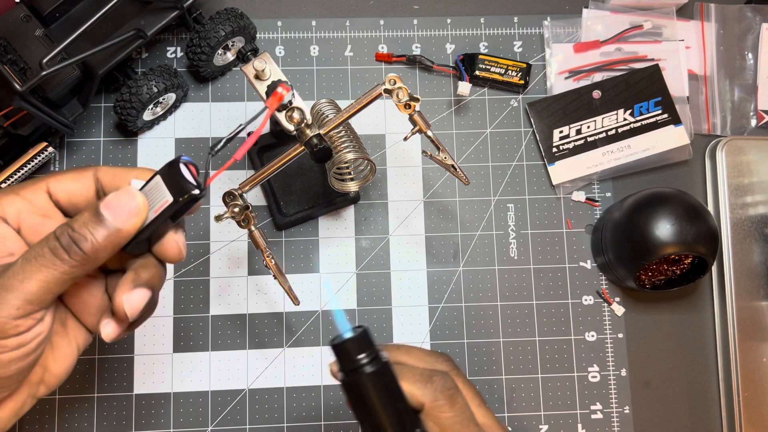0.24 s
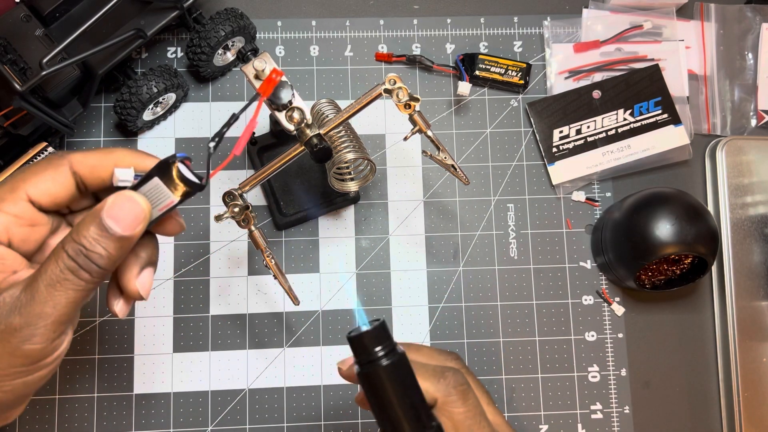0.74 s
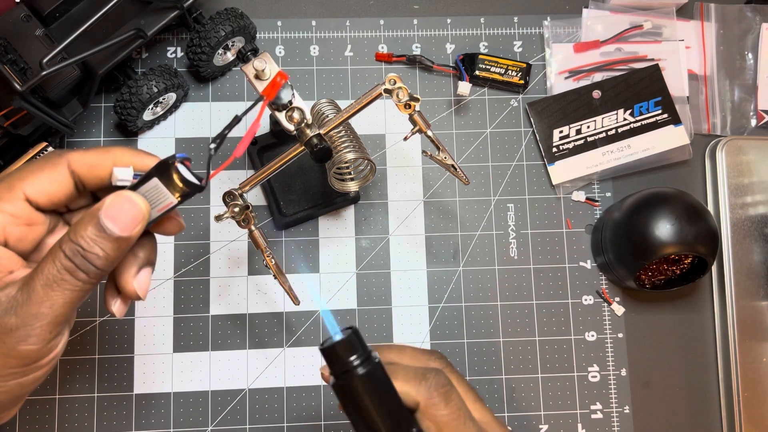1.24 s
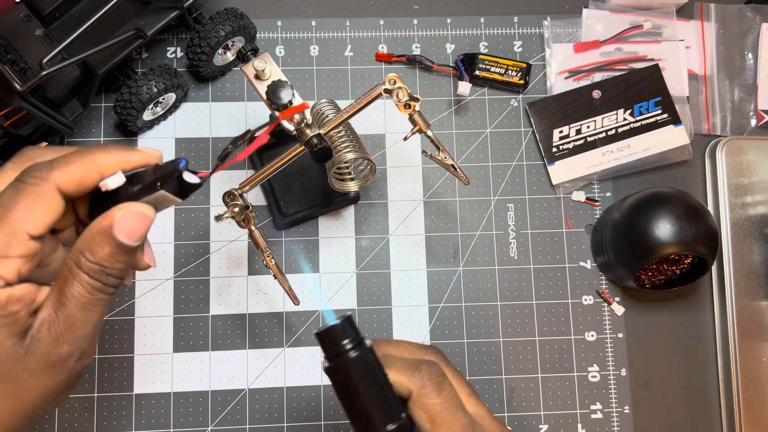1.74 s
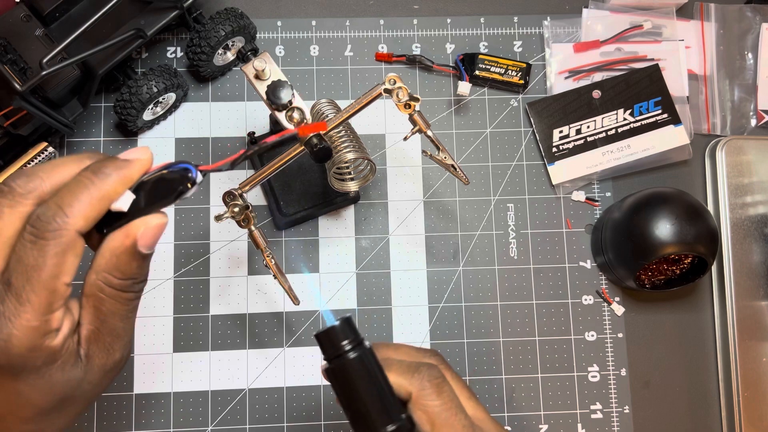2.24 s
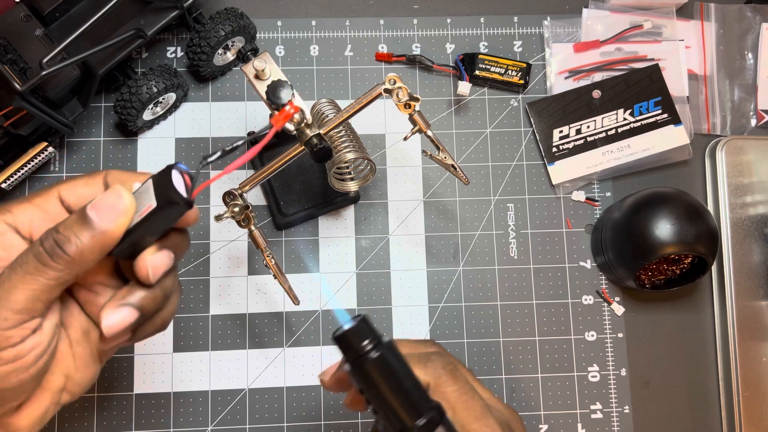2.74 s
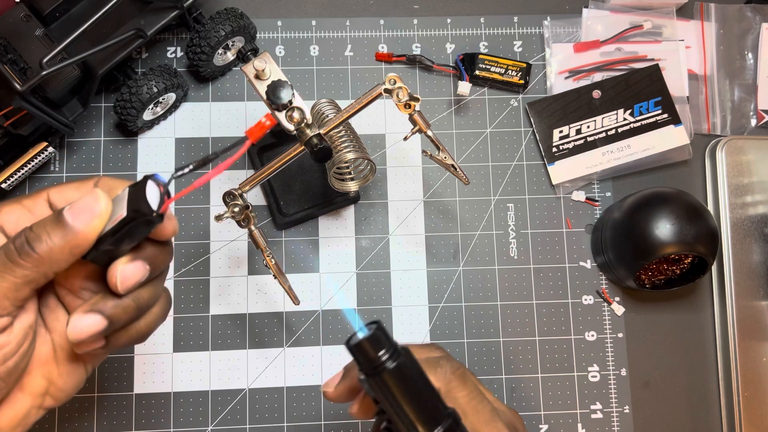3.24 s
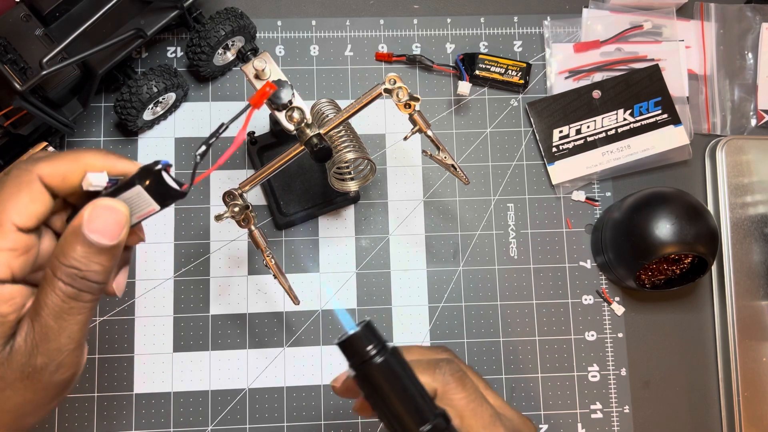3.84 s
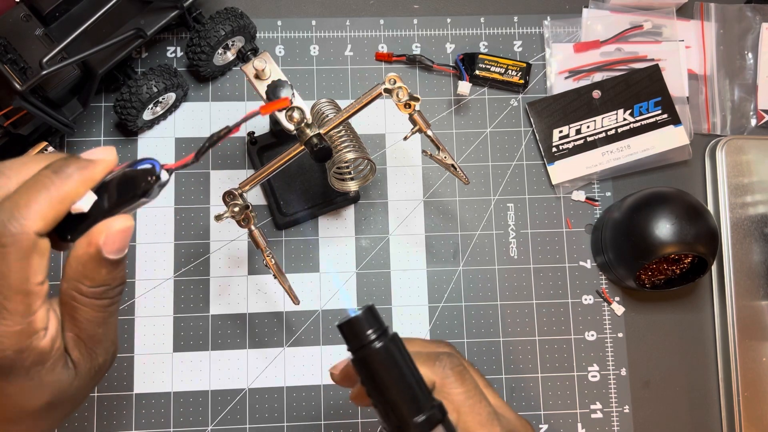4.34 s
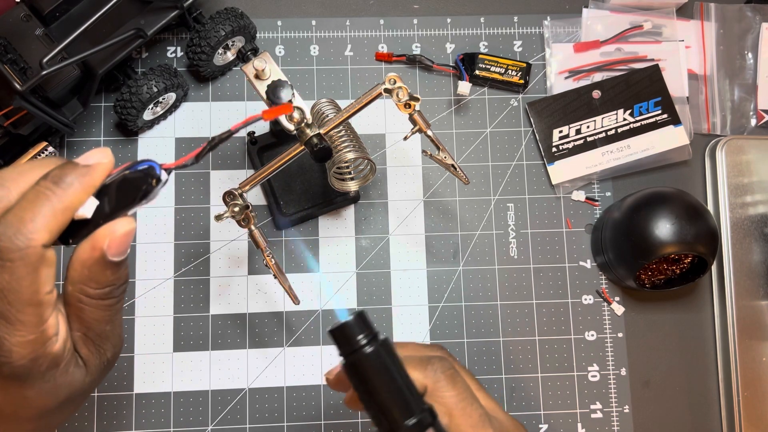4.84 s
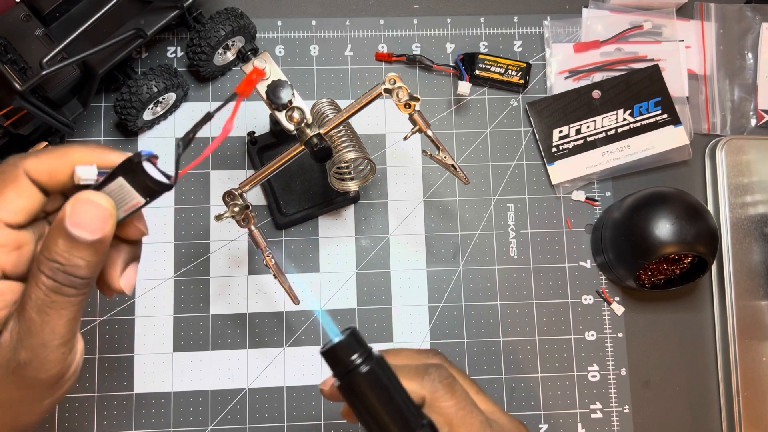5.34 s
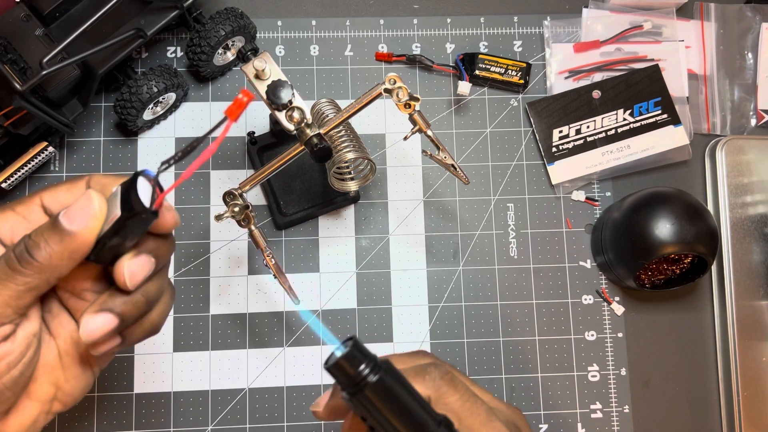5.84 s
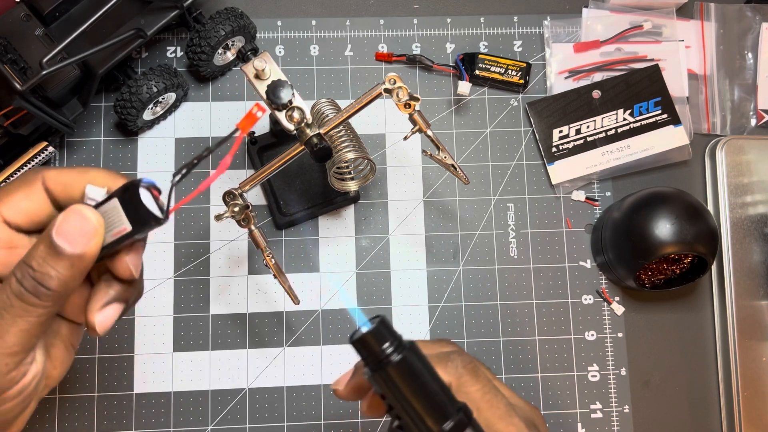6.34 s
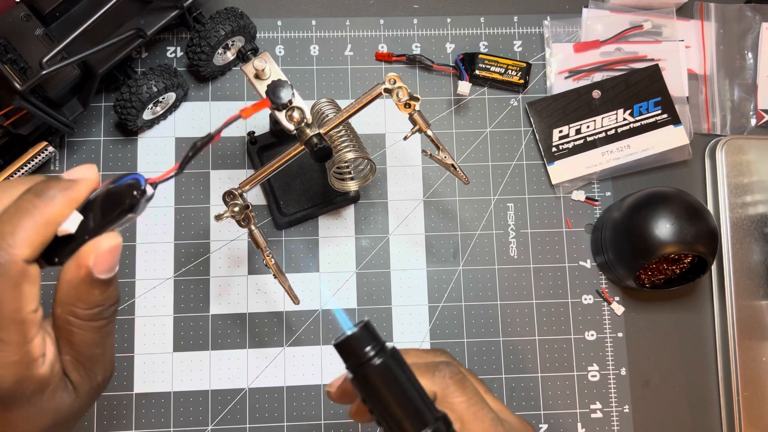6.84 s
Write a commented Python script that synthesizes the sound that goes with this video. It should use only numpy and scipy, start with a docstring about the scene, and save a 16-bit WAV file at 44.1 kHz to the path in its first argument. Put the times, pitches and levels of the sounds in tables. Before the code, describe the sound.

For about seven seconds a handheld gas torch burns close to the microphone in a workshop, already lit at the start and never going out. A bright, wide gas hiss is constant, with two narrow breathy whistling bands, one fairly high and one higher. Beneath lie very low stirring air and a surging low throb. The flame tears into ragged roars several times a second: longer flares near 0, 1.0, 2.6, 4.0 and 5.4, shorter ones between, the hiss swelling slightly in the gaps. Small dry spits crack around 0.2, 0.7, 1.6, 2.5, 3.1, 3.8, 4.5, 5.2, 5.8 and 6.9. As the torch turns, notably around 2.5 and from 4.6 onward, the hiss changes colour and its resonances glide. Close bench reflections and a faint room tail surround it; it ends still burning.

```python
"""Above a workbench, close to the microphone, a handheld gas torch burns with a faint workshop tail.
A stir of hot air and a low, surging flame throb lie underneath, both made of shaped noise.
The flame flares into a ragged roar of noise bursts several times a second and now and then spits.
The gas jet hisses and whistles through the burner tube's resonances, which glide as the torch turns."""
import sys
import numpy as np
from scipy import signal
from scipy.fft import rfft, irfft
from scipy.io import wavfile

SR = 44100
rng = np.random.default_rng(int(sys.argv[2]) if len(sys.argv) > 2 else 0)


def master(y):
    """Save y as 16-bit WAV."""
    cut = np.clip(np.atleast_2d(y).T, -1, 1)
    pcm = np.round(cut * 32767)  # scale
    wavfile.write(sys.argv[1], SR, pcm.astype(np.int16))


N = 313110
T = np.arange(N) / SR
HZ = np.fft.rfftfreq(N, 1 / SR)

# Spectral shapes before levelling, dB being relative density.
# hot air stirring near the microphone: [f/Hz, level/dB]
DRAUGHT_SHAPE = [(5, -1.5), (14, 8.5), (25, -4), (42, -3), (60, -4.5), (80, -19.5), (130, -44), (400, -63)]
# the low pulsing of the flame: [f/Hz, level/dB]
THROB_SHAPE = [(50, -28), (82, -22), (103, -6.5), (122, -4), (140, .5), (153, -3), (167, 2), (188, -15.5),
               (222, -10), (238, -12), (256, -14), (312, -18), (400, -50.5)]
# the steadier rumble of the burning gas: [f/Hz, level/dB]
RUMBLE_SHAPE = [(100, -2.5), (180, -2), (205, -1.5), (238, 1.5), (258, -1.5), (310, -4.5), (342, -10.5),
                (500, -43.5)]
# the burning eddies: [f/Hz, level/dB]
ROAR_SHAPE = [(150, -3.5), (300, -6), (380, 4), (432, -12), (505, 1), (720, 1.5), (1000, -6.5),
              (1130, -9.5), (1390, -7), (1680, -21), (1900, -10.5), (2080, -11), (2400, -22.5), (3200, -21),
              (5000, -32), (10000, -51)]
# the hiss under the tube resonances: [f/Hz, level/dB]
JET_SHAPE = [(500, 9), (1500, -44), (2400, -1.5), (3400, -4), (3750, -2), (4650, 5), (5020, -4), (5600, -6),
             (6700, -3.5), (7300, 1.5), (10000, -3.5), (10700, -12), (14000, -7), (14500, -25), (15600, -8)]

# moments when the low throb swells or chokes: [middle t/s, length t/s, change level/dB]
THROB_SURGES = [(1.16, 0.042, -7), (1.597, 0.075, 7.5), (1.786, 0.028, -7), (2.157, .1, 3.5),
                (3.822, 0.046, 6), (4.194, 0.034, 6), (4.284, 0.1, -6), (4.951, 0.12, 4.5),
                (5.391, 0.076, 6), (5.495, 0.065, -5), (5.56, 0.046, 5.5), (6.154, 0.31, 2),
                (6.94, 0.072, -2.5)]
# bench and room resonances, lifts and dips in the roar: [f/Hz, width f/Hz, level/dB]
BENCH_MODES = [(355.5, 18, -20), (496, 7.1, -7.5), (550.5, 7.5, 4), (599, 18, -13.5), (778, 21, -2.5),
               (737, 30, 2), (838, 12, 5.5), (880, 48, -1.5), (938, 20, 7.5), (1042, 14, 9.5),
               (1079, 34, -11.5), (1212, 34, 3.5), (1414, 3.4, 7.5), (1833, 9.9, 6.5)]
# flares, in which the flame tears into a roar: [start t/s, length t/s, level/dB before the roar's trim]
FLARES = [(0.011, 0.24, -44.5), (0.294, 0.11, -43.5), (0.432, 0.032, -43.5), (0.599, 0.063, -43.5),
          (0.733, 0.07, -45), (0.882, 0.11, -45.5), (1.039, 0.24, -44.5), (1.39, 0.065, -47),
          (1.577, 0.075, -44), (1.776, 0.04, -45), (1.931, 0.062, -45.5), (2.115, 0.08, -47),
          (2.29, 0.035, -48.5), (2.462, 0.058, -45), (2.537, 0.03, -47.5), (2.602, 0.21, -47.5),
          (2.841, 0.033, -50), (2.91, 0.019, -43), (3.075, 0.078, -47), (3.228, 0.073, -47.5),
          (3.37, 0.14, -46), (3.542, 0.071, -46.5), (3.64, 0.06, -45), (3.76, 0.049, -47),
          (3.855, 0.09, -46), (3.966, 0.18, -46.5), (4.199, 0.13, -44), (4.469, 0.095, -45),
          (4.803, 0.14, -48), (5.22, 0.058, -46), (5.377, 0.27, -45.5), (5.73, 0.04, -47),
          (5.792, 0.047, -42), (5.946, 0.065, -42.5), (6.077, 0.1, -48.5), (6.206, 0.022, -47),
          (6.271, 0.04, -48), (6.318, 0.13, -46.5), (6.714, 0.038, -46), (6.792, 0.044, -47),
          (6.909, 0.17, -46)]
# spits of the flame: [t/s, crack peak level/dB before the spits' trim]
SPITS = [(.168, -32), (.218, -25.5), (0.248, -28), (.374, -35), (0.662, -26.5), (1.595, -31),
         (2.479, -27.5), (3.132, -25), (3.766, -31), (4.472, -28.5), (4.712, -30.5), (5.161, -28.5),
         (5.806, -32), (6.916, -30.5)]
# how the torch is held: [t/s, turn from 0 = first angle to 1 = turned away]
TORCH_TURN = [(0, 0.19), (1.2, 0.025), (2.3, 0.019), (2.7, 0.31), (3.1, 0.3), (3.6, 0.14), (4.6, 0.13),
              (5, 0.53), (5.5, 0.54), (6.4, 0.71), (6.8, 0.59), (7.1, 0.8)]
# slow drift of the gas: [t/s, hiss level/dB, whistle level/dB], before lulls and trims
GAS_DRIFT = [(0, -52.7, -58), (.55, -53, -56), (1.15, -54, -61), (1.5, -53, -57), (2.25, -54.5, -57),
             (2.5, -52.5, -61.5), (3.05, -55.5, -59), (3.6, -54, -58.5), (4.2, -54, -64), (4.6, -53, -57),
             (5.05, -55, -61), (5.3, -54, -63), (5.6, -56.5, -59), (6.0, -57, -61), (6.6, -54.5, -62),
             (7.1, -55, -66)]
# resonances of the burner tube, levels before wavering:
# [f/Hz, shift f/Hz when turned away, width f/Hz, level/dB at first angle, level/dB turned away]
TUBE_MODES = [(3124, -30, 257, 10.5, 6), (4050, -170, 290, 1, 7.5), (6280, 42.5, 135, -0.5, 18),
              (6540, -120, 410, 5.5, 2), (8030, -380, 280, 7.5, 1.5), (8840, -640, 210, 15.5, 10),
              (8980, -300, 150, 15, 7), (9380, -250, 240, 5.5, 17), (9540, -90.5, 330, 14, 11.5),
              (9710, 141.5, 830, 9, 7), (12000, 252, 660, 3.5, -1), (14100, 62, 320, 7, -1)]
# the tube's two modes that nearly sing, levels on top of the gas drift:
# [f/Hz, shift f/Hz when turned away, width f/Hz, level/dB at first angle, level/dB turned away]
SINGING_MODES = [(2892, 20, 145, -3, -2.5), (5660, 190, 170, 0.4, -1)]
# echoes off the bench and the things on it: [delay t/s, added delay t/s when turned away, level/dB]
BENCH_ECHOES = [(.00153, -0.0088, -15), (.0029, 0.017, -6), (.0047, -0.027, -10.5), (.0078, 0.0054, -22),
                (0.0128, -0.006, -15)]
# broad dips and lifts between the tube's resonances: [f/Hz, width f/Hz, level/dB]
JET_TILTS = [(4920, 480, -5.5), (11700, 900, 1.5), (13300, 410, 12), (14700, 840, -1)]

FLARE_ATTACK_S, FLARE_RELEASE_S = 0.015, 0.011
SIMMER_DB = -49  # centre level of the roar between flares, before its trim
FALTER_S, FALTER_DB = 0.024, -2.5  # the roar falters while the unburnt gas of a spit gathers
EDGE_HZ = 15780  # corner of the closing low-pass; no hiss above it


def from_db(db):
    """Decibels to gain."""
    return 10 ** (np.asarray(db) / 20)


def unit(x):
    """Scales to rms 1."""
    return x / np.sqrt(np.mean(x ** 2) + 1e-20)


def curve(rows, axis):
    """One column of a time table at every sample."""
    rows = np.asarray(rows)
    return np.interp(T, rows[:, 0], rows[:, axis])


def slope(points):
    """Gain at every frequency, drawn through a few points over log frequency."""
    hz, db = np.transpose(points)
    return from_db(np.interp(np.log(HZ + 1), np.log(hz + 1), db))


def bell(hz, width):
    """Power response of one resonance, top 1."""
    return 1 / (1 + (2 * (HZ - hz) / width) ** 2)


def bells(modes):
    """Gain of several lifts and dips, added in dB."""
    return from_db(sum(db * bell(hz, width) for hz, width, db in modes))


def colour(x, gain):
    """Causal (minimum-phase) filter with the given gain, so that rings follow their cause."""
    cepstrum = irfft(np.log(np.maximum(gain, 1e-5)), N)
    # folding the negative times onto the positive ones makes it causal
    cepstrum[1:N // 2] *= 2
    cepstrum[N // 2 + 1:] = 0
    return irfft(rfft(x) * np.exp(rfft(cepstrum)), N)


def noise(gain):
    """Noise of rms 1 with the given spectrum."""
    return unit(irfft(rfft(rng.standard_normal(N)) * gain, N))


def steadied(x, span_s):
    """Evens out the slow swells of a noise and keeps the quick ones."""
    window = np.hanning(int(span_s * SR))
    power = signal.fftconvolve(x ** 2, window / window.sum(), "same")
    return x / np.sqrt(power + 1e-9)


def flicker(rate_hz):
    """Random wavering of rms 1, mostly below the given rate."""
    t = np.linspace(0, N / SR, 16384)
    hz = np.fft.rfftfreq(len(t), t[1])
    spectrum = rfft(rng.standard_normal(len(t))) / (1 + (hz / rate_hz) ** 4)
    return np.interp(T, t, unit(irfft(spectrum)))


def narrow(centre_hz, shift_hz, width):
    """Noise ringing in one steep-sided resonance that glides as the torch turns; density 1 at its centre."""
    hz = centre_hz + shift_hz * curve(TORCH_TURN, axis=1)
    # two equal poles, widened so that the pair has the wanted half-power width
    pole = np.exp(-np.pi * width / np.sqrt(np.sqrt(2) - 1) / SR)
    wander = signal.lfilter([(1 - pole) ** 2], [1, -2 * pole, pole * pole], rng.standard_normal((2, N)))
    angle = 2 * np.pi * np.cumsum(hz) / SR
    return np.sqrt(2) * (wander[0] * np.cos(angle) + wander[1] * np.sin(angle))


def room(x, wet_db, t60_s):
    """Adds a faint workshop tail: decaying noise that starts 4 ms after the direct sound."""
    t = np.arange(SR // 3) / SR
    tail = rng.standard_normal(len(t)) * from_db(-60 * t / t60_s) * (t > .004)
    return x + from_db(wet_db) * signal.fftconvolve(x, tail / np.linalg.norm(tail))[:N]


def draught(level_db=-45):
    """Hot air stirring near the microphone: steady, very low noise."""
    return noise(slope(DRAUGHT_SHAPE)) * from_db(level_db)


def throbbing(calm_db, throb_db=-42.0, rumble_db=-46.0, waver_db=3.5, follow=0.19, rumble_share=0.21):
    """The flame pulses low, in surges several times a second and most between flares; its rumble follows a little."""
    surge_db = sum(db * np.exp(-(2 * (T - s) / length) ** 2) for s, length, db in THROB_SURGES)
    pulsing = noise(bell(hz=5.7, width=11.5) * (HZ < 40))
    surge_db = surge_db + follow * calm_db + waver_db * np.tanh(0.96 * pulsing)
    throb = steadied(noise(slope(THROB_SHAPE)), span_s=0.078) * from_db(throb_db + surge_db)
    rumble = noise(slope(RUMBLE_SHAPE)) * from_db(rumble_db + rumble_share * surge_db)
    return throb + rumble


def roar_colour():
    """Spectrum of burning gas as it comes off the bench."""
    return slope(ROAR_SHAPE) * bells(BENCH_MODES)


def spits(decay_s=0.00047, level_db=-2.5, thump_db=-6, thump_s=0.0029):
    """A pocket of gas goes off at once: a short crack on a soft push of pressure."""
    out, t = np.zeros(N), np.arange(1024) / SR
    push = t / thump_s * np.exp(1 - t / thump_s)
    swell = t / decay_s * np.exp(-t / decay_s)
    body = colour(signal.unit_impulse(N), roar_colour())[:len(t)]
    for s, db in SPITS:
        grain = rng.standard_normal(len(t)) * swell
        crack = signal.fftconvolve(grain, body)[:len(t)]
        spit = from_db(db + level_db) * (crack / abs(crack).max() + from_db(thump_db) * push)
        part = out[round(s * SR):][:len(t)]
        part += spit[:len(part)]
    return out


def flaring(waver_db=1.0, sputter_db=3.5):
    """Level of the roar in dB: each flare rises quickly, holds and dies back to a sputtering simmer."""
    t = np.arange(0, N / SR, .001)
    start, length, db = np.transpose(FLARES)[:, :, None]
    rise = np.clip((t - start) / FLARE_ATTACK_S + .5, 0, 1)
    fall = np.exp(-np.maximum(t - start - length, 0) / FLARE_RELEASE_S)
    flares = np.interp(T, t, (from_db(db) * rise * fall).max(axis=0))
    simmer = from_db(SIMMER_DB + sputter_db * np.tanh(flicker(rate_hz=42)))
    return 20 * np.log10(np.hypot(flares, simmer)) + waver_db * flicker(rate_hz=8.9)


def faltering(lead_s=0.0069):
    """Gain of the roar, which dips around a moment just before each spit."""
    return from_db(FALTER_DB * sum(np.exp(-((T - s + lead_s) / FALTER_S) ** 2) for s, _ in SPITS))


def roar(throb, flare_db, surge_db=5.8, ragged_db=2.3, level_db=-1.78,
         split_hz=1050, crackle_db=-2.0, brighten=0.75, sputter_db=5.0):
    """Eddies burn in bursts on the crests of a strong throb, and run together when it is weak."""
    crest_db = surge_db * np.tanh(unit(throb) / 2)
    bursts = from_db(crest_db + ragged_db * np.clip(flicker(rate_hz=95), -2, 2))
    burning = steadied(colour(bursts * rng.standard_normal(N), roar_colour()), span_s=0.073)
    # the part above the split: the smallest eddies
    crackle = irfft(rfft(burning) / (1 + (split_hz / (HZ + 1)) ** 6), N)
    # they come and go in clumps, and gain in strong flares
    clumps_db = brighten * (flare_db - flare_db.mean()) + sputter_db * np.tanh(2 * flicker(rate_hz=79))
    ragged = burning + (from_db(clumps_db + crackle_db) - 1) * crackle
    return ragged * from_db(flare_db + level_db)


def whistle(flow, calm_db, pulse_db=3.0, low_share=0.71, follow=0.37, waver_db=1.13):
    """Two breathy notes of the tube, narrow noise bands, swell between flares, the lower one less."""
    turn = curve(TORCH_TURN, axis=1)
    swell_db = curve(GAS_DRIFT, axis=2) + follow * calm_db + waver_db * flicker(rate_hz=11)
    out = np.zeros(N)
    for (hz, shift_hz, width, first_db, turned_db), share in zip(SINGING_MODES, (low_share, 1)):
        note = steadied(narrow(hz, shift_hz, width), span_s=0.35) * from_db(pulse_db * flow)
        angle_db = first_db + (turned_db - first_db) * turn
        note_db = angle_db + share * swell_db + (1 - share) * swell_db.mean()
        out += unit(note) * from_db(note_db)
    return out


def echoed(x):
    """Near reflections comb the hiss, and the comb slides as the torch turns; rms 1."""
    turn = curve(TORCH_TURN, axis=1)
    echoes = sum(from_db(db) * np.interp(T - delay - extra * turn, T, x) for delay, extra, db in BENCH_ECHOES)
    return unit(x + echoes)


def jet(flow, calm_db, pulse_db=1.87, level_db=1.82, wander_db=1.73, flutter_db=1., follow=0.28, swell_db=0.66):
    """Gas hisses through the burner tube; turning the torch shifts the bands that reach the microphone."""
    turn = curve(TORCH_TURN, axis=1)
    hiss = colour(rng.standard_normal(N), slope(JET_SHAPE))
    for hz, shift_hz, width, first_db, turned_db in TUBE_MODES:
        # turbulence feeds each resonance unevenly
        mode_db = first_db + (turned_db - first_db) * turn + wander_db * flicker(rate_hz=6.3)
        hiss = hiss + narrow(hz, shift_hz, width) * from_db(mode_db)
    flutter = from_db(pulse_db * flow + flutter_db * flicker(rate_hz=180))
    lull_db = follow * calm_db + swell_db * flicker(rate_hz=7.3)  # the hiss gains between flares
    return echoed(hiss * flutter) * from_db(curve(GAS_DRIFT, axis=1) + lull_db + level_db)


def scene(travel_s=0.00786, waver=1.):
    """One unsteady gas flow drives the hiss first and the flame a moment later; jet and roar take turns."""
    flare_db = flaring()
    calm_db = flare_db.mean() - flare_db  # how far the roar lies under its usual level
    low_flame = throbbing(calm_db)
    early_throb = unit(np.interp(T + travel_s, T, low_flame))
    flow = unit(early_throb + waver * flicker(rate_hz=58))
    flame = room(roar(low_flame, flare_db) * faltering() + spits(), wet_db=-13.5, t60_s=0.66)
    gas = colour(jet(flow, calm_db) + whistle(flow, calm_db), bells(JET_TILTS))
    return (draught() + low_flame + flame + room(gas, wet_db=-11.0, t60_s=0.14))[None]


def record(dry):
    """Steep linear-phase low-pass that closes off the hiss above its corner."""
    low_pass = signal.firwin(1023, EDGE_HZ, window=("kaiser", 9), fs=SR)
    return signal.oaconvolve(dry, low_pass[None], "same")


dry = scene()
out = record(dry)
master(out)
```